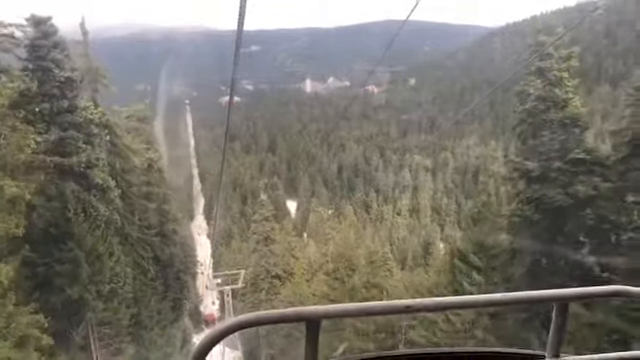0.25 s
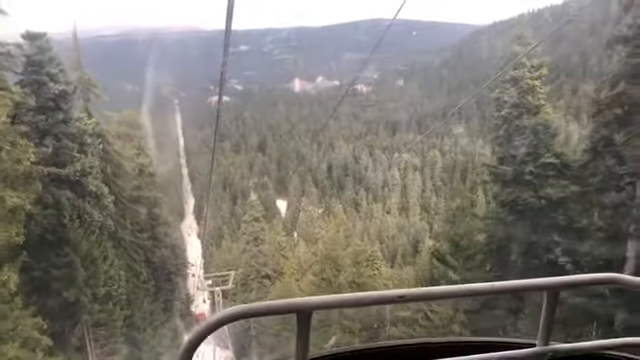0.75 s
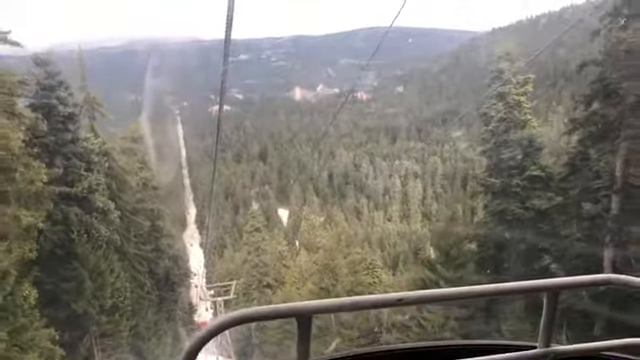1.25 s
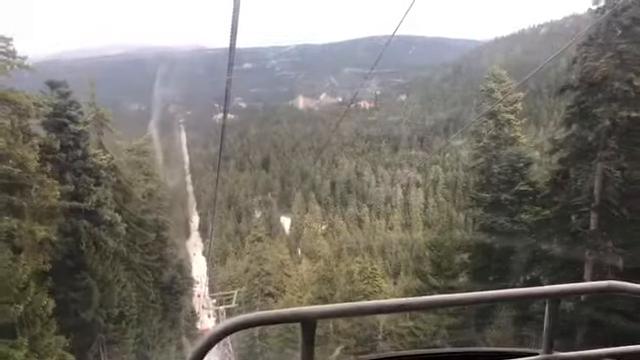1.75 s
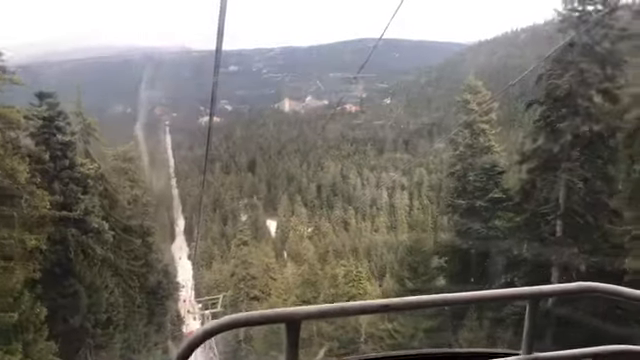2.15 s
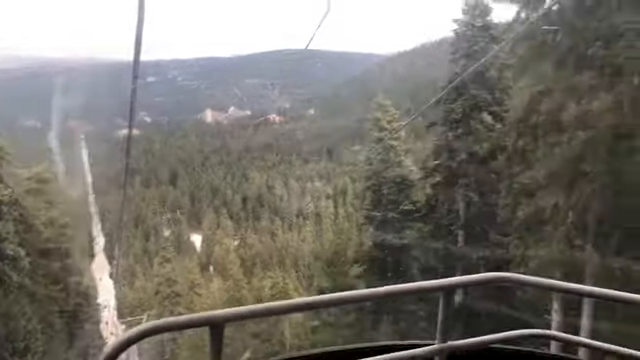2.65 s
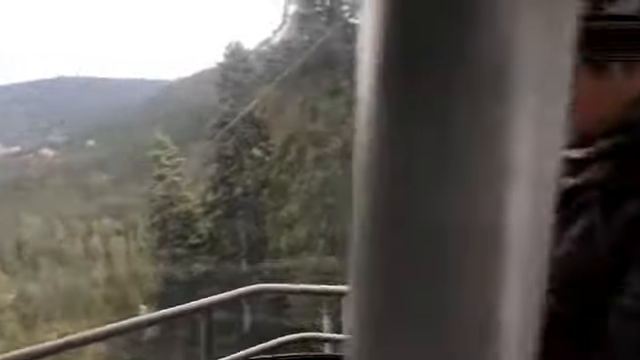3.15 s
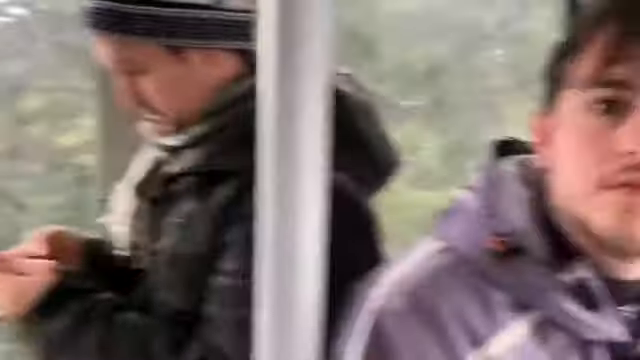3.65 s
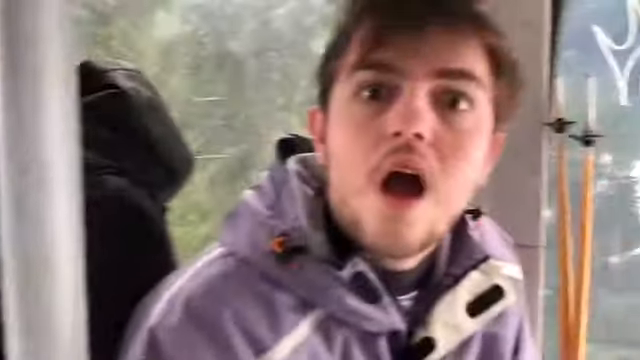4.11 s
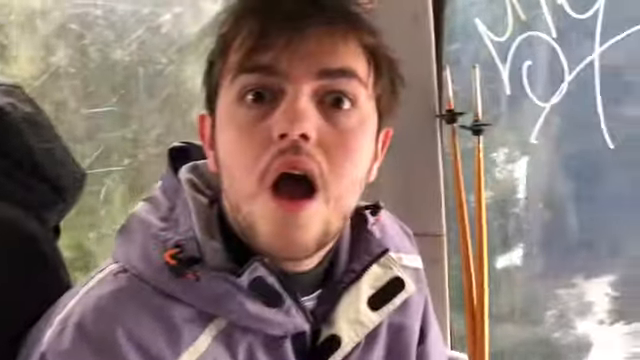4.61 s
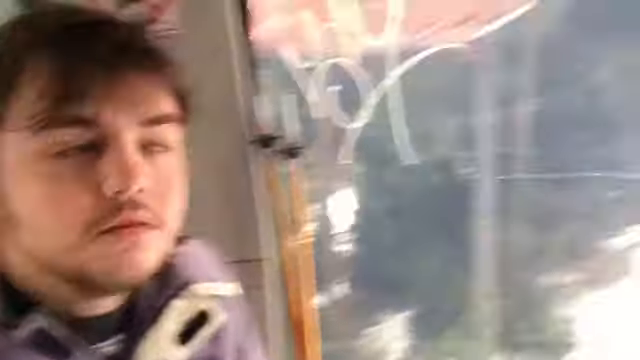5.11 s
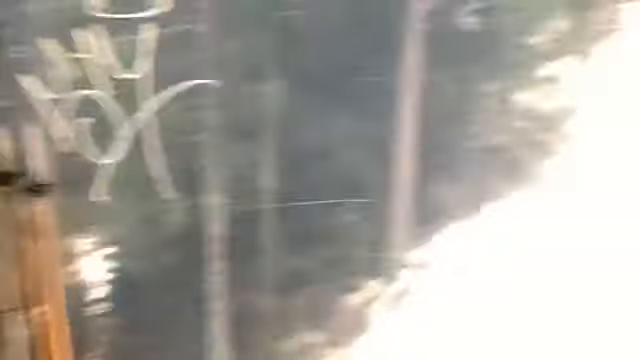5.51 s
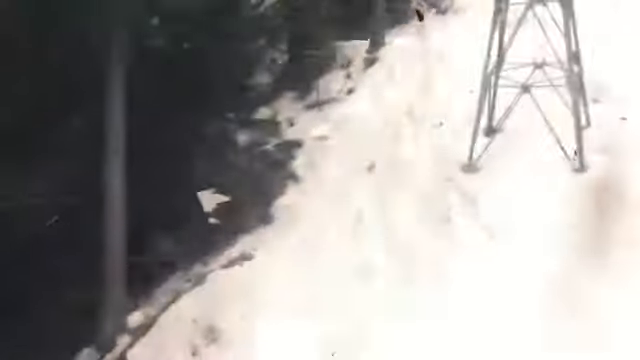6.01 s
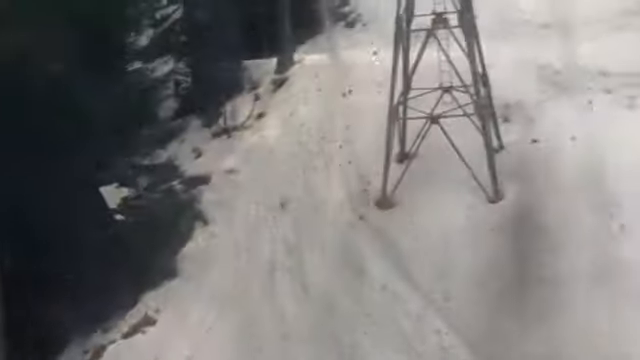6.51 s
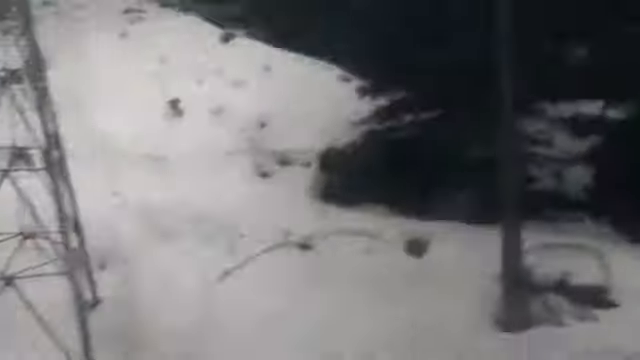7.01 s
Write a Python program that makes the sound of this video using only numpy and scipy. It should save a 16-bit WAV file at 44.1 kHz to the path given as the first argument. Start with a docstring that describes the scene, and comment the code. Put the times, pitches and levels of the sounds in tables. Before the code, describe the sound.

A deep, booming rumble runs throughout inside a moving cable car, throbbing unevenly, with droning panels and a faint wind hiss, heard on a handheld phone. A nylon jacket swishes in the first half second. From 0.5 to 2 seconds loose fittings chatter and clank among brief cloth scuffs and soft knocks, ending in a dull bump and a stronger throb at 2 seconds. Faint rubbing follows around 2.6 seconds. Short rattles and clicks come between 3.1 and 3.8 seconds. From 4.4 to 5.7 seconds there is a run of light, hollow ticks with a thin metallic ring. The rumble grows heavier after 5 seconds, and the trim buzzes lightly with each pulse. A padded thud lands at about 6.7 seconds amid more rattling, and jackets rub again from 7 seconds as the rumble and wind swell slightly.

```python
"""Aerial lift cabin, from inside.

The running cable shakes the cabin: its air booms near 87 Hz and throbs, its panels drone, trim buzzes.
Wind brushes the shell. Jolts set loose fittings chattering and ringing; nylon jackets rub and catch.
Small hard parts click and clank, and soft blows bump the body. Heard on a phone held in the cabin."""
import sys
import numpy as np
from scipy import signal
from scipy.fft import rfft, irfft
from scipy.io import wavfile
from scipy.ndimage import uniform_filter1d

SR = 44100
rng = np.random.default_rng(int(sys.argv[2]) if len(sys.argv) > 2 else 0)


def master_out(mix):
    """Clip the mix to full scale and print it as 16-bit PCM to the path in sys.argv[1]."""
    frames = np.transpose(np.atleast_2d(mix))
    ceiling = np.clip(frames, -1, 1)
    pcm = np.round(ceiling * 32767).astype(np.int16)
    wavfile.write(sys.argv[1], SR, pcm)


N = 320166
T = np.arange(N) / SR
LN_1000 = np.log(1000)  # 60 dB of decay


def undb(db):
    """Decibels to gain."""
    return 10 ** (np.asarray(db) / 20)


def unit(x):
    """Scale to rms 1."""
    return x / np.sqrt(np.mean(x ** 2) + 1e-20)


def curves(table):
    """Each column after t/s as a signal."""
    t_s, *columns = np.transpose(table)
    return [np.interp(T, t_s, column) for column in columns]


def add(out, t_s, x):
    """Mix x into out from t_s."""
    start = max(int(t_s * SR), 0)
    out[start:start + len(x)] += x[:len(out) - start]


def band(x, f_hz, width_hz):
    """One resonance, unity gain at its centre."""
    q = f_hz / min(width_hz, SR / 4)
    return signal.lfilter(*signal.iirpeak(f_hz, q, fs=SR), x)


def band_twice(x, f_hz, width_hz):
    """Two equal resonances in series."""
    return band(band(x, f_hz, width_hz), f_hz, width_hz)


def bandpass(x, low_hz, high_hz):
    """Steep band-pass."""
    return signal.sosfilt(signal.butter(4, [low_hz, high_hz], "band", fs=SR, output="sos"), x)


def colour(x, spectrum):
    """Shape x by (f/Hz, gain/dB) points."""
    f_hz, gain_db = np.transpose(spectrum)
    bins_hz = np.maximum(np.fft.rfftfreq(len(x), 1 / SR), 1)
    gain = undb(np.interp(np.log(bins_hz), np.log(f_hz), gain_db))
    return irfft(rfft(x) * gain, len(x))


def noise():
    """White noise."""
    return rng.standard_normal(N)


def walk(rate_hz):
    """Smooth random drift, rms 1."""
    hold = int(SR / rate_hz)
    steps = np.repeat(rng.standard_normal(N // hold + 1), hold)
    return unit(uniform_filter1d(uniform_filter1d(steps, hold), hold)[:N])


def grains(rate_hz, spread_db):
    """Random tiny impacts of uneven size, rms 1."""
    hits = rng.random(N) < rate_hz / SR
    return unit(hits * noise() * undb(spread_db * np.clip(noise(), -2, 2)))


def resonate(modes):
    """Random shaking rings (f/Hz, width/Hz, gain/dB) modes; rms 1."""
    return unit(sum(undb(db) * band_twice(noise(), f_hz, 1.36 * width_hz)
                    for f_hz, width_hz, db in modes))


def struck_mode(age_s, f_hz, t60_s, phase_rad=0):
    """Decaying sine."""
    return np.exp(-LN_1000 * age_s / t60_s) * np.sin(2 * np.pi * f_hz * age_s + phase_rad)


def swell(t_s, length_s):
    """Smooth rise and fall, 1 at t_s."""
    return np.cos(np.pi * np.clip((T - t_s) / length_s, -.5, .5)) ** 2


# wind hiss: f/Hz, density/dB
WIND_SPECTRUM = [(300, -4), (1400, -1.5), (2400, -2.5), (3500, -2), (5000, -5.5), (8000, -12.5),
                 (10500, -17), (14000, -23), (16000, -35.5)]
# wind strength: t/s, level/dB
WIND_LEVEL = [(0, -66.5), (1.0, -66.5), (1.7, -70), (2.4, -66.5), (3.3, -66.5), (4.15, -66.5),
              (4.35, -70.5), (4.65, -71), (5.0, -69), (5.5, -66.5), (6.05, -67.5), (6.5, -67.5),
              (7.26, -59.5)]

def wind():
    """Air brushing the shell hisses."""
    level_db, = curves(WIND_LEVEL)
    hiss = unit(colour(noise(), WIND_SPECTRUM))
    return hiss * undb(level_db + .5 * walk(rate_hz=5.6))


# cloth scuffs: t/s, level/dB, length/s, f/Hz
SCUFFS = [(.732, -58, .035, 3200), (.942, -49, .018, 3400), (1.585, -57, .02, 4600),
          (1.845, -52.5, .03, 3000), (1.962, -57, .03, 3200), (3.905, -62.5, .045, 7000),
          (6.70, -63, .04, 5000)]

def scuffs(slips):
    """Quick rubs of cloth rise fast and fade."""
    out = np.zeros(N)
    for t_s, db, length_s, f_hz in SCUFFS:
        start = int(t_s * SR)
        rub = unit(band(slips[start:start + SR // 2], f_hz, f_hz / .6))
        progress = 3 * T[:len(rub)] / length_s
        add(out, t_s, undb(db) * rub * progress * np.exp(1 - progress))
    return out


# nylon friction: f/Hz, density/dB
NYLON_SPECTRUM = [(200, -21.5), (500, -0.5), (1000, 5.5), (1800, 4), (3400, -4.5), (4600, -9),
                  (6000, -13.5), (8000, -16.5), (10500, -23.5), (15500, -32)]
# sleeve strokes: peak t/s, rub/dB, length/s, whistle/dB, whistle f/Hz, width/Hz
SLIDES = [(0, -57, 0.13, -67, 4080, 600), (0.335, -54, 0.36, -70, 5170, 2000),
          (.49, -65, .3, -64, 2900, 1200), (0.86, -66.5, 1.0, -78, 4080, 200),
          (2.545, -78, .26, -69, 7200, 2800), (2.56, -73, .6, -68, 4700, 1000),
          (2.58, -74, .16, -67, 4200, 2200), (2.715, -73, 0.15, -73, 4900, 2200),
          (3.7, -71.5, 1.7, -78, 4400, 2500), (5.45, -76, 1.1, -81, 3790, 1500),
          (6.62, -69.5, 1.36, -76, 3790, 1500), (6.955, -60, 0.2, -66, 3620, 2000),
          (7.14, -57.5, .24, -58.5, 3600, 2000), (7.26, -53.5, 0.3, -55, 3500, 2000),
          (7.26, -70, .5, -63.5, 6000, 4000)]

def jackets(rest_db=-72):
    """Nylon on nylon: fine slips hiss; weave ribs cross at an unsteady rate, a smeared whistle."""
    slips = unit(colour(noise() + .79 * grains(rate_hz=5400, spread_db=5.5), NYLON_SPECTRUM))
    rub = slips * undb(.9 * walk(rate_hz=70))
    out = rub * undb(rest_db) + scuffs(slips)
    for t_s, rub_db, length_s, whistle_db, f_hz, width_hz in SLIDES:
        whistle = unit(band_twice(noise(), f_hz, width_hz))
        out += swell(t_s, length_s) * (rub * undb(rub_db) + whistle * undb(whistle_db))
    return out


# cloth catches: t/s, level/dB, half of the 1/e time/s, low f/Hz, high f/Hz
SCRAPES = [(0.732, -63.5, 0.015, 2200, 7000), (.9435, -68, .009, 5000, 14000),
           (1.585, -58, 0.015, 2600, 5450), (1.849, -74, .014, 6500, 14000),
           (2.682, -67, 0.036, 3400, 6500), (6.712, -72, 0.011, 3000, 12000),
           (6.969, -54, 0.0052, 2400, 3900), (7.041, -67, .055, 2500, 13000)]

def scrapes():
    """Cloth catches, lets go and scrapes to rest."""
    out, age_s = np.zeros(N), T[:SR // 3]
    slips = noise() + grains(rate_hz=2500, spread_db=4)
    for t_s, db, half_s, low_hz, high_hz in SCRAPES:
        stretch = np.roll(slips, -int(t_s * SR))[:len(age_s)]
        scrape = unit(bandpass(stretch, low_hz, high_hz))
        add(out, t_s, undb(db) * scrape * np.exp(-(age_s / (2 * half_s)) ** 2))
    return out


# small contacts: t/s, peak/dB, f/Hz, width/Hz, t60/s
CLICKS = [(.8095, -43, 1400, 800, .016), (.8105, -54, 6700, 1000, .016), (1.975, -43, 850, 600, .018),
          (3.660, -35.5, 1150, 550, .022), (3.804, -44.5, 2300, 700, .022), (5.624, -42, 850, 500, .04),
          (6.8355, -48, 8400, 1000, .004), (6.8356, -41, 1800, 3000, .006)]

def clicks():
    """Small hard parts touch and are damped at once."""
    out, age_s = np.zeros(N), T[:SR // 20]
    for t_s, db, f_hz, width_hz, t60_s in CLICKS:
        burst = rng.standard_normal(len(age_s)) * np.exp(-LN_1000 * age_s / t60_s)
        click = band_twice(burst, f_hz, 1.5 * width_hz)
        add(out, t_s, undb(db) * click / np.abs(click).max())
    return out


# jostling parts: t/s, low mode peak/dB, contact/s, low f/Hz, mid f/Hz, high f/Hz, step per mode/dB
CLANKS = [(.8095, -46, .006, 1500, 1800, 3650, -5), (.9445, -47.5, .016, 1870, 2670, 3910, -3.5),
          (1.355, -45, .016, 1450, 1950, 2150, -2.5), (1.587, -50.5, .014, 1610, 2870, 3920, -1.5),
          (3.804, -48.5, .008, 1300, 2100, 2800, -2.5), (5.624, -48.5, .014, 1130, 2560, 2900, -1)]

def clanks():
    """A brief run of soft contacts rings three modes of a hard part."""
    out, age_s = np.zeros(N), T[:SR // 5]
    for t_s, db, contact_s, *modes_hz, step_db in CLANKS:
        contacts = rng.standard_normal(len(age_s)) * np.exp(-(age_s / contact_s) ** 2)
        for k, f_hz in enumerate(modes_hz):
            push = band(contacts, f_hz, f_hz / 2)
            ring = band(push, f_hz, width_hz=150)
            add(out, t_s, undb(db + k * step_db) * ring / np.abs(ring).max())
    return out


# restlessness of the fittings: t/s, drive/dB
JOLT_DRIVE = [(0, -57.5), (1.1, -54.5), (2.6, -62.5), (3.4, -56), (4.7, -65.5), (5.6, -59), (6.2, -61.5),
              (7.26, -67.5)]

def light_jolts(rate_hz=12, rise_s=.002, fade_s=.017):
    """Faint runs of tiny contacts at uneven intervals."""
    envelope, age_s = np.zeros(N), T[:SR // 5]
    jolt = (1 - np.exp(-age_s / rise_s)) * np.exp(-age_s / fade_s)
    for k, (late, strength) in enumerate(rng.random((int(rate_hz * N / SR), 2))):
        add(envelope, (k + late) / rate_hz, (.5 + strength) * jolt)
    drive_db, = curves(JOLT_DRIVE)
    return undb(drive_db) * envelope * np.sign(noise())


# chatter of fittings: t/s, drive/dB, length/s, scrape re drive/dB
RATTLES = [(0.536, -58.5, 0.099, -14), (0.702, -54, 0.1, -9), (0.887, -59.5, 0.054, -18),
           (1.163, -55.5, 0.098, -21), (1.354, -59, 0.05, -17), (1.462, -56, 0.07, 7),
           (1.784, -58.5, 0.21, -13), (1.905, -53.5, 0.043, 0), (2.411, -58.5, .035, -14),
           (3.148, -55.5, 0.024, -15), (3.33, -54, 0.027, -14), (3.377, -56.5, 0.021, -19),
           (3.586, -53, 0.024, -19), (3.667, -54.5, 0.026, -21), (4.375, -57, 0.046, -9),
           (4.732, -55.5, 0.04, -13), (4.771, -58.5, 0.033, -13), (4.904, -60, 0.03, -18),
           (5.454, -56, 0.09, -11), (5.563, -56.5, 0.064, -18), (5.972, -57.5, 0.045, -16),
           (6.712, -51.5, 0.05, -11), (6.821, -55, 0.027, -13.5), (6.903, -55, 0.1, -16)]

def rattles(knock_db=14.5):
    """Each hard jolt yields a knock and a fading run of contacts."""
    age_s = T[:SR // 5]
    for t_s, db, length_s, scrape_db in RATTLES:
        run = np.sign(rng.standard_normal(len(age_s))) * np.exp(-2 * age_s / length_s)
        run[0] += undb(knock_db)
        yield t_s, run * undb(db), scrape_db


# single knocks of fittings: t/s, drive/dB, scrape re drive/dB
TICKS = [(4.413, -51, -9), (4.452, -57.5, -10), (4.4818, -52, -6), (4.523, -51.5, -15), (4.592, -66, -10),
         (4.806, -49.5, -6.5), (4.9405, -53.5, -8), (5.179, -57, -11), (5.215, -53, -16), (5.711, -49, -6)]

def ticks(fade_s=.0056, tail_db=-11, tail_s=.045):
    """Each soft knock yields a dull burst of contacts with a weaker rattling tail."""
    age_s = T[:SR // 5]
    envelope = np.exp(-age_s / fade_s) + undb(tail_db) * np.exp(-age_s / tail_s)
    for t_s, db, scrape_db in TICKS:
        taps = np.sign(rng.standard_normal(len(age_s)))
        run = bandpass(taps * envelope, low_hz=100, high_hz=5200)
        yield t_s, run * undb(db), scrape_db


# contact response: f/Hz, gain/dB
FITTING_SPECTRUM = [(120, -19.5), (300, 1.5), (600, 11), (1000, 9), (1400, 6), (1900, -2), (2500, -6.5),
                    (3500, -26), (5000, -33), (8000, -44), (15000, -45.5)]
# fitting resonances: f/Hz, t60/s, gain/dB
FITTING_MODES = [(512, .08, -9), (1200, .02, -7), (1315, .055, 0), (1490, .06, -1), (1620, .03, -8),
                 (2280, .03, -10.5), (2460, .03, -9.5), (2900, .05, -13), (3300, .025, -14),
                 (3950, .04, -12)]

def fittings():
    """Contacts make loose fittings clatter and ring; rattles and ticks add a bright scrape."""
    contacts, friction = np.zeros(N), np.zeros(N)
    for t_s, run, scrape_db in [*rattles(), *ticks()]:
        add(contacts, t_s, run)
        add(friction, t_s, run * undb(scrape_db))
    contacts += light_jolts() + grains(rate_hz=400, spread_db=1.5) * undb(-71.5)
    clatter = colour(contacts, FITTING_SPECTRUM)
    ring = sum(undb(db) * band(contacts, f_hz, LN_1000 / np.pi / t60_s)
               for f_hz, t60_s, db in FITTING_MODES)
    scrape = band(colour(friction, NYLON_SPECTRUM), f_hz=2400, width_hz=4000)
    return undb(8) * clatter + undb(10.5) * ring + undb(-2.5) * scrape


def tick_rings(ring_db=-2.5, scatter_db=9, rise_s=.001):
    """Each soft knock strikes all fitting modes unevenly and leaves a hollow ring."""
    out, age_s = np.zeros(N), T[:SR // 5]
    push = 1 - np.exp(-(age_s / rise_s) ** 2)
    for t_s, db, _ in TICKS:
        for f_hz, t60_s, mode_db in FITTING_MODES:
            scatter, half_turns = rng.uniform(-1, 1, 2)
            gain = undb(db + ring_db + mode_db + scatter_db * scatter)
            add(out, t_s, gain * push * struck_mode(age_s, f_hz, t60_s, np.pi * half_turns))
    return out


# trim resonances: f/Hz, width/Hz, gain/dB
TRIM_MODES = [(357, 39, 0), (448, 35, -2), (613, 98, 0), (860, 130, -5)]
# trim buzz: t/s, level re throbs/dB
BUZZ_LEVEL = [(0, -45.5), (3.4, -42.5), (5.0, -36.5), (6.2, -33.5), (7.26, -38.5)]
# loose metal resonances: f/Hz, width/Hz, gain/dB
METAL_MODES = [(1320, 65, 0), (1492, 50, -2)]
# metal ring: t/s, level/dB
METAL_LEVEL = [(0, -72), (2.3, -75), (3.3, -71.5), (4.1, -72), (4.5, -68), (4.9, -68.5), (5.6, -72),
               (7.26, -77)]

def trim():
    """Trim buzzes with each throb; loose metal rings unevenly at two pitches."""
    buzz_db, = curves(BUZZ_LEVEL)
    metal_db, = curves(METAL_LEVEL)
    buzz = resonate(TRIM_MODES) * throbs() * undb(buzz_db)
    metal = resonate(METAL_MODES) * undb(metal_db + 4.2 * walk(rate_hz=22))
    return buzz + metal


# blows on the body: t/s, level/dB, f/Hz, t60/s
BUMPS = [(.57, -45, 490, .1), (.742, -40, 530, .08), (.884, -40, 660, .06), (.949, -34.5, 505, .075),
         (1.515, -46, 860, .05), (1.771, -34, 470, .05), (1.855, -37, 380, .07), (1.976, -23, 150, .16),
         (1.978, -24.5, 345, .055), (6.462, -42, 900, .04)]

def bumps(rise_s=.0015):
    """Each soft blow briefly swings one patch of the body."""
    out, age_s = np.zeros(N), T[:SR // 4]
    push = 1 - np.exp(-age_s / rise_s)
    for t_s, db, f_hz, t60_s in BUMPS:
        add(out, t_s, undb(db) * push * struck_mode(age_s, f_hz, t60_s))
    return out


# wall resonances: f/Hz, t60/s, gain/dB
WALL_MODES = [(290, 0.032, -5.5), (450, .02, -5), (640, .014, -3), (923, .015, -2), (1370, 0.011, -6),
              (1900, 0.0093, -9.5), (2340, 0.015, -13)]

def thud(t_s=6.7458, drive_db=-25.5, rise_s=.0007):
    """One padded blow swings the wall's damped modes."""
    out, age_s = np.zeros(N), T[:SR // 10]
    push = 1 - np.exp(-(age_s / rise_s) ** 2)
    for f_hz, t60_s, db in WALL_MODES:
        ring = struck_mode(age_s, f_hz, t60_s, 2 * np.pi * rng.random())
        add(out, t_s, undb(drive_db + db) * push * ring)
    return out


# single-panel swells: peak t/s, level/dB, length/s, f/Hz
PANEL_HUMS = [(0.284, -49.5, 0.18, 264), (.66, -46.5, 0.25, 261.7), (1.127, -48, 0.22, 265),
              (3.05, -48.5, 0.27, 238.7), (3.698, -43, 0.39, 143.5), (5.154, -39.5, 0.44, 145.7),
              (5.244, -41.5, 0.73, 172), (7.156, -36.5, 0.2, 145.3)]

def panel_hums():
    """A panel shaken at its own pitch hums for a moment."""
    drift_rad = .5 * walk(rate_hz=14)
    return sum(undb(db) * swell(t_s, length_s) * np.sqrt(2) * np.sin(2 * np.pi * f_hz * T + drift_rad)
               for t_s, db, length_s, f_hz in PANEL_HUMS)


# ride levels: t/s, sway/dB, drone/dB, roar/dB
RIDE_LEVELS = [(0, -33, -35.5, -47.5), (.75, -32.5, -46, -42.5), (1.1, -32.5, -42, -47),
               (1.7, -32, -40, -45.5), (2.0, -35.5, -34.5, -42.5), (2.3, -32.5, -41.5, -49.5),
               (3.6, -33, -44, -46), (4.1, -33, -43.5, -48), (4.8, -32, -48, -49), (5.12, -31, -42, -45.5),
               (5.8, -27.5, -42, -46.5), (6.3, -32.5, -42, -51.5), (7.26, -25.5, -42, -43.5)]
# body resonances: f/Hz, width/Hz, gain/dB
BODY_MODES = [(30.7, 6.7, -4.5), (45.76, 9.8, -1.5), (57.4, 14, -5.5), (76.2, 7, 3.5), (96.6, 9.5, -0.5)]
# panel resonances: f/Hz, width/Hz, gain/dB
PANEL_MODES = [(116, 12, -6), (143.5, 12, 0.5), (172, 7, 1), (187, 8, -4), (205, 12, -8), (220, 15, -8),
               (264, 11, -10), (292, 16, -18), (335, 14, -18), (371, 22, -17.5), (430, 30, -23)]
# cable roar: f/Hz, density/dB
ROAR_SPECTRUM = [(18, -13), (45, 10), (130, 21), (240, 14.5), (320, 9), (450, 5.5), (600, 2), (800, 0.5),
                 (1100, -7), (1700, -11.5), (2800, -20.5), (5000, -36.5), (16000, -57.5)]

def cabin():
    """The running cable roars and shakes the cabin: the body sways, the panels drone."""
    sway_db, drone_db, roar_db = curves(RIDE_LEVELS)
    sway = resonate(BODY_MODES) * undb(sway_db)
    drone = resonate(PANEL_MODES) * undb(drone_db)
    flutter_db = .9 * walk(rate_hz=30)
    roar = unit(colour(noise(), ROAR_SPECTRUM)) * undb(roar_db + flutter_db)
    return sway + drone + roar


# harder shakes: peak t/s, level/dB, length/s
THROBS = [(0.131, -31, 0.077), (0.574, -25.5, 0.17), (0.759, -31, 0.13), (1.092, -30, 0.28),
          (1.551, -27.5, 0.68), (1.975, -21, 0.39), (2.242, -24, 0.2), (2.406, -25.5, 0.22),
          (2.682, -29.5, 0.38), (2.925, -30.5, 0.17), (3.419, -22, 0.13), (3.666, -32, 0.5),
          (4.097, -21, 0.29), (4.357, -24, 0.14), (5.101, -28, 0.25), (5.272, -25, 0.28),
          (5.529, -20.5, 0.26), (5.98, -26.5, 0.17), (6.199, -17.5, 0.1), (6.511, -27.5, 0.31),
          (6.901, -19.5, 0.26), (7.053, -19.5, 0.11)]

def throbs():
    """Envelope of the cable's harder shakes."""
    return sum(undb(db) * swell(t_s, length_s) for t_s, db, length_s in THROBS)


# air resonance between throbs: t/s, f/Hz, level/dB
BOOM = [(0, 86.5, -21), (.4, 86, -46), (.85, 89.5, -29.5), (2.0, 87, -39), (2.55, 89.5, -44),
        (3.05, 85, -30), (4.2, 86.5, -34.5), (4.9, 86.5, -28.5), (5.5, 86.3, -31.5), (6.35, 86, -24.5),
        (6.95, 88.7, -30), (7.26, 88.5, -35)]

def boom(wander_hz=1.156, waver_db=1.5):
    """The cabin's main air resonance, unevenly driven, wanders in phase and strength and throbs."""
    f_hz, idle_db = curves(BOOM)
    phase_rad = 2 * np.pi * np.cumsum(f_hz + wander_hz * walk(rate_hz=6)) / SR
    phase_rad += .3 * walk(rate_hz=30)
    idle = undb(idle_db + waver_db * walk(rate_hz=22))
    flutter_db = .9 * walk(rate_hz=40)
    return np.sqrt(2) * np.sin(phase_rad) * (idle + throbs()) * undb(flutter_db)


def scene():
    """Mono sum inside the cabin."""
    ride = boom() + cabin() + wind() + panel_hums()
    loose_parts = trim() + fittings() + tick_rings() + clanks()
    cloth = jackets() + scrapes()
    knocks = clicks() + bumps() + thud()
    return (ride + loose_parts + cloth + knocks)[None]


def record(dry):
    """The phone cuts the deepest bass and the top."""
    bass_cut = [(15, -16), (23, -8), (29, 0), (1000, 0)]  # f/Hz, gain/dB
    top_hz = 15600
    lowpass = signal.ellip(8, .2, 70, top_hz, fs=SR, output="sos")
    return signal.sosfilt(lowpass, colour(dry[0], bass_cut)[None])


dry = scene()
out = record(dry)
master_out(out)
```